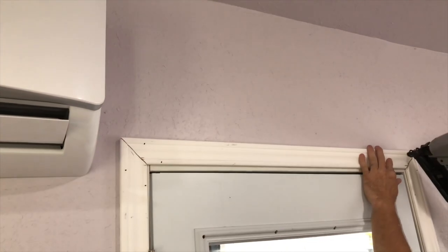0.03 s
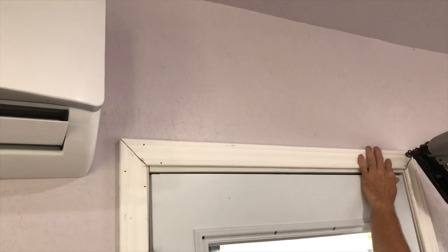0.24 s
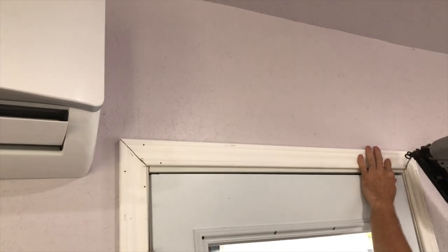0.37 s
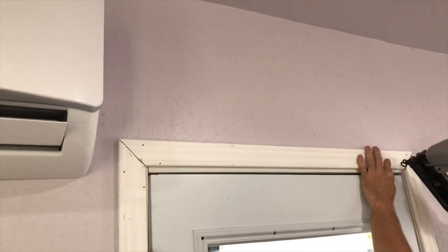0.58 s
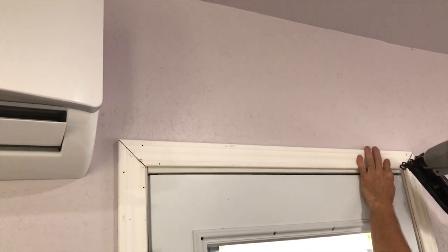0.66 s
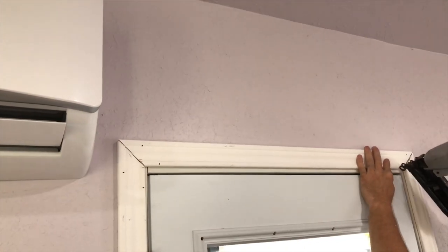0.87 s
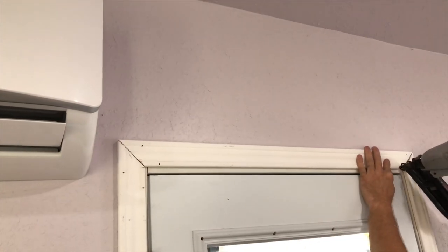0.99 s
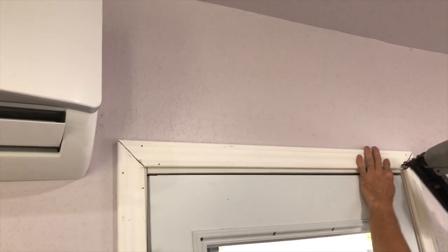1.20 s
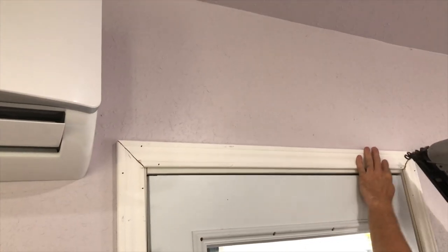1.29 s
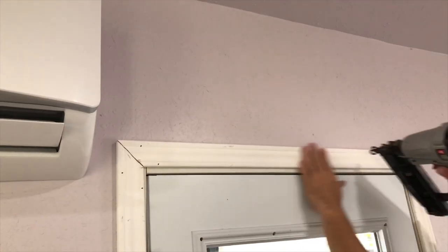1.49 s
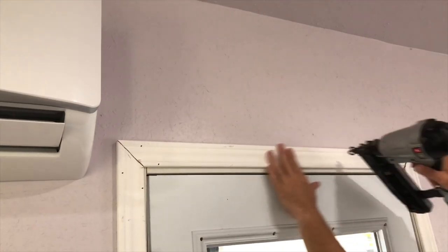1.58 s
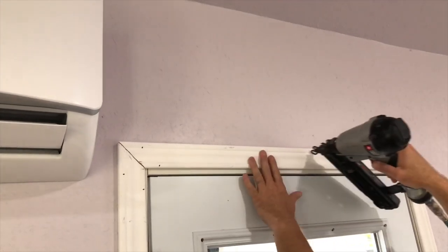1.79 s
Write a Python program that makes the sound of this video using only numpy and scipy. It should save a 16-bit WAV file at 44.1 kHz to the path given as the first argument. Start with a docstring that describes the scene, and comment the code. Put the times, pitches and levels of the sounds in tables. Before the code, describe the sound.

Nail gun shoots twice into door trim, clicking before each crack and hissing air after, echoing room

```python
"""Bare, very live room: a pneumatic nail gun fires twice into door trim, over quiet room tone and an old tail.
Nose clicks, squeak and wall boom: ringing modes, coloured noise bursts and a rough, narrow tone.
Shots: piston slam, nail blow 10 ms later (noise plus modes), then echoes, reflections and a long ring.
Exhaust: bright spit, fading hiss and low puff modes, washed out by diffuse reverberation.
The close microphone limits and clips."""
import sys
import numpy as np
from scipy import signal
from scipy.fft import rfft, irfft, next_fast_len
from scipy.io import wavfile

SR = 44100
rng = np.random.default_rng(int(sys.argv[2]) if len(sys.argv) > 2 else 0)


def generate_wav(sig):
    """Save sig (samples, or channels by samples) to the path in sys.argv[1] as 16-bit PCM at SR."""
    pcm = np.round(np.clip(np.atleast_2d(sig).T, -1, 1) * 32767).astype(np.int16)
    wavfile.write(sys.argv[1], SR, pcm)


N = 81585

# room decay: f/Hz, t60/s
ROOM_T60_S = [(60, 0.63), (200, 0.91), (460, 1.37), (1000, 1.99), (2000, 2.34), (4000, 1.64), (6300, 1.8),
              (9400, 0.86), (13000, 0.59), (16000, 0.45)]
# room response spectrum: f/Hz, gain/dB
ROOM_COLOUR_DB = [(40, 4), (100, -12), (150, -9.5), (250, 1), (500, -1), (1000, 0), (2400, -0.5),
                  (3200, -4), (4500, -3), (6500, -5.5), (10000, -3), (15500, -4)]
# quiet room tone: f/Hz, gain/dB
FLOOR_DB = [(20, -32), (60, -36), (110, -35), (160, -40.5), (320, -27.5), (600, -35), (1500, -25.5),
            (3000, -38.5), (8000, -49), (15500, -85)]
# what is left of an earlier shot, spectrum shape: f/Hz, gain/dB
OLD_TAIL_SHAPE_DB = [(24, -40), (40, -20), (82, -3.5), (150, -10.5), (220, -11.5), (412, -16), (580, -15),
                     (700, -10), (1000, -8.5), (1600, -7.5), (2250, -11), (3500, -23.5), (6500, -29.5),
                     (10000, -40), (15000, -47)]
OLD_TAIL_START_DB, OLD_TAIL_FALL_DB_PER_S = -31, 40

# nose squeak rubbing into place: start t/s, hold/s, level/dB
SQUEAK_TIMING = (0.98, .06, -31)
SQUEAK_START_HZ, SQUEAK_SAG_HZ_PER_S, SQUEAK_NOISE_CUTOFF_HZ = 834, 322, 99
# nose and trigger clicks: t/s, ring level/dB, grit level/dB
CLICKS = [(0.189, -20, -19), (0.19, -4.5, -19), (0.2018, -17, -10), (1.0065, -8, -10), (1.0092, -10, -10),
          (1.0124, -4, -3.5), (1.0142, -0.5, -11), (1.1217, -14, -14), (1.1282, -14, -11)]
# click ring: f/Hz, level/dB, t60/s
CLICK_MODES = [(1790, -24, 0.014), (2498, -23, .018), (3350, -20, .012), (3870, -17, .008),
               (4200, -13, 0.018), (4560, -28, .018), (7620, -29, 0.017), (10300, -32, 0.043)]
# click grit: f/Hz, gain/dB
CLICK_GRIT_DB = [(500, -9.5), (2000, -10.5), (5000, -8), (11000, -22.5), (15500, -37)]
# wall boom as the gun is pressed home: f/Hz, level/dB, t60/s
WALL_MODES = [(71, -22.5, 0.44), (128, -19.5, .06), (215, -21, 0.034), (286, -35, .25)]
# thud noise of the same press: f/Hz, gain/dB
THUD_DB = [(30, -12), (60, -5), (100, 0.5), (150, -9.5), (260, -10), (400, -21), (900, -39), (4000, -63)]
PRESS_S = 1.0265

# exhaust vents: t/s, spit level/dB, spit hold/s, hiss level/dB, puff level/dB, reverberation level/dB
VENTS = [(0.2994, 0, 0.0058, 1, -1.5, 1.5), (1.2160, -4.5, 0.0022, -3, -5.5, 0)]
# opening spit: f/Hz, gain/dB
SPIT_DB = [(100, -19), (500, -15.5), (1000, -2.5), (2500, -5.5), (4000, 1.5), (6500, 6), (10000, 1),
           (15500, -3.5)]
# escaping air: f/Hz, gain/dB
HISS_DB = [(40, -31), (100, -18), (200, -6), (420, -3), (1000, -6.5), (2000, -7), (3200, -8.5),
           (5200, -6.5), (6500, -5.5), (9400, -9.5), (12000, -14), (15500, -27.5)]
# low room modes stirred by the puff: f/Hz, level/dB, t60/s
PUFF_MODES = [(99.8, -15, 0.55), (64.8, -25.5, 0.94), (116.9, -16, 0.17)]
# what the exhaust leaves in the room: f/Hz, gain/dB
AIR_RETURN_DB = [(40, 5), (150, -2), (400, 21), (1000, 24), (2000, 22), (3200, 24), (5200, 29),
                 (6500, 29.5), (9400, 21), (12000, 11), (15500, 13)]
AIR_WET_DB, CLICK_WET_DB = -4.5, -1
SURGE_RMS_DB, SURGE_CUTOFF_HZ = 1.3, 70.5

# shots: t/s, piston level/dB, nail level/dB, first reflections level/dB, reverberation level/dB
SHOTS = [(0.2122, -2, -1.5, 1, 2), (1.134, -3.5, -6, -4, -3)]
NAIL_DELAY_S = 0.00991
# piston slam noise: f/Hz, gain/dB
PISTON_DB = [(40, -9), (200, 5.5), (460, -3), (900, 12), (1600, 2), (2600, -0.5), (4000, -6), (7000, -8),
             (10000, -8), (15500, -21)]
# gun body and trim rung by the piston: f/Hz, level/dB, t60/s
BODY_MODES = [(805, -11.5, 0.033), (1457, -1, 0.016), (1660, -2, 0.012), (2760, -3, 0.017),
              (3240, -8, 0.014), (4100, -2.5, 0.013), (6940, -7.5, 0.012)]
# dull knock of the trim: f/Hz, level/dB, t60/s
TRIM_MODES = [(150, -17.5, 0.054), (259, -16, 0.1)]
# nail blow noise: f/Hz, gain/dB
NAIL_DB = [(40, -25), (200, 14), (460, 4.5), (1000, 12), (2000, 6.5), (4000, 7), (6500, 5.5), (9400, -4),
           (15500, -14)]
# driver blade and nail: f/Hz, level/dB, t60/s
NAIL_MODES = [(1510, -4.5, 0.018), (2550, -4, 0.02), (3330, 0, .017), (4290, -11, 0.017), (6910, -7, 0.018),
              (7740, -16, 0.021)]
# first distinct echoes: delay t/s, level/dB
ECHOES = [(.0262, -7.5), (.0312, -17), (.0445, -17)]
# dense early reflections: f/Hz, gain/dB
REFLECTIONS_DB = [(40, -5), (130, -8), (250, -4.5), (500, 1.5), (720, 2), (950, -0.5), (1300, -7.5),
                  (2500, -1.5), (4000, -8.5), (6500, -4.5), (9400, -14.5), (15500, -41)]
# what a shot leaves in the room: f/Hz, gain/dB
BLOW_RETURN_DB = [(40, 4), (100, 4), (150, 17), (250, 30.5), (500, 23), (700, 21.5), (950, 35),
                  (1500, 25.5), (2400, 24.5), (3200, 30), (4500, 34), (6500, 20), (10000, 16), (15500, -11)]
# tones that linger after each shot: f/Hz, level/dB, t60/s
LINGERING_MODES = [(280.6, -43, 0.99), (392.3, -27, 1.14), (574, -29, 0.83), (672, -27, 0.54),
                   (870, -28, 1.23), (923, -29.5, 2), (1170, -44, 1.5), (1421, -47, 5.4), (2600, -29, 1.1),
                   (4479, -51, 1.1), (5150, -25.5, 1.3), (5800, -25.5, 0.97), (6600, -30, 1),
                   (7600, -28, 1.1)]
BARK_HZ, BARK_WIDTH_HZ, BARK_DB = 959, 120, 7.5

LOW_CUT_HZ, TOP_CUT_HZ = 38, 15850
LIMIT_DB, LIMIT_SHARE = -7, 0.58  # share of the overshoot taken off
LIMIT_SMOOTH_S, OVERSHOOT_FALL_DB_PER_S = 0.0014, 177  # fall is before the share
CLIP_TOP = 0.87


def from_db(db):
    """Decibels to gain."""
    return 10 ** (np.asarray(db) / 20)


def seconds():
    """Time of every sample."""
    return np.arange(N) / SR


def at_hz(points, hz):
    """Read a table on a log-frequency axis."""
    rows = np.array(points)
    return np.interp(np.log(np.maximum(hz, 1)), np.log(rows[:, 0]), rows[:, 1])


def colour(x, spectrum):
    """Causal minimum-phase filter with the given spectrum, via the folded cepstrum."""
    size = 2 * next_fast_len(N)
    gain = from_db(at_hz(spectrum, np.fft.rfftfreq(size, 1 / SR)))
    cepstrum = irfft(np.log(gain))
    cepstrum[1:size // 2] *= 2
    cepstrum[size // 2 + 1:] = 0
    return irfft(rfft(x, size) * np.exp(rfft(cepstrum)))[:N]


def envelope(start, attack, hold, t60):
    """Linear rise, hold, exponential fall; all in seconds."""
    age = seconds() - start
    rise = np.clip(age / attack, 0, 1)
    return rise * np.exp(-np.log(1000) * np.maximum(age - attack - hold, 0) / t60)


def burst(start, attack, hold, t60):
    """White noise under an envelope."""
    return rng.standard_normal(N) * envelope(start, attack, hold, t60)


def ring(start, modes, attack):
    """Decaying sine modes set off at one moment."""
    age = seconds() - start
    out = 0
    for hz, db, t60 in modes:
        out = out + from_db(db) * envelope(start, attack, 0, t60) * np.sin(2 * np.pi * hz * age)
    return out


def low_noise(cutoff_hz):
    """Low-passed noise at unit RMS."""
    sos = signal.butter(2, cutoff_hz, fs=SR, output="sos")
    noise = signal.sosfilt(sos, rng.standard_normal(N))
    return noise / np.std(noise)


def delayed(x, delay):
    """Same sound, later by whole samples."""
    return np.interp(np.arange(N) - np.round(delay * SR), np.arange(N), x, left=0)


def room_response(gap, build):
    """Diffuse reverberation: builds after a gap and dies band by band."""
    white = rng.standard_normal((2, N))
    edges = np.geomspace(35, 17000, num=21)
    out = 0
    for k, (low, high) in enumerate(zip(edges, edges[1:])):
        sos = signal.butter(2, [low, high], "band", fs=SR, output="sos")
        band = signal.sosfilt(sos, white[k % 2])  # neighbouring bands use different noise
        t60 = at_hz(ROOM_T60_S, np.sqrt(low * high))
        out = out + band * envelope(gap, build, 0, t60)
    return colour(out / np.sqrt(np.sum(out ** 2)), ROOM_COLOUR_DB)


def in_room(x, room):
    """What the room returns: convolution with its response."""
    return signal.fftconvolve(x, room)[:N]


def room_tone():
    """Steady coloured noise of the quiet room."""
    return colour(rng.standard_normal(N), FLOOR_DB)


def old_tail():
    """Last of an earlier shot's reverberation: coloured noise falling exponentially."""
    noise = colour(rng.standard_normal(N), OLD_TAIL_SHAPE_DB)
    level_db = OLD_TAIL_START_DB - OLD_TAIL_FALL_DB_PER_S * seconds()
    return noise / np.std(noise) * from_db(level_db)


def squeak():
    """Rough, narrow stick-slip tone that sags in pitch."""
    start, hold, db = SQUEAK_TIMING
    age = np.maximum(seconds() - start, 0)
    phase = 2 * np.pi * np.cumsum(SQUEAK_START_HZ - SQUEAK_SAG_HZ_PER_S * age) / SR
    in_phase = low_noise(SQUEAK_NOISE_CUTOFF_HZ) + 1
    quadrature = low_noise(SQUEAK_NOISE_CUTOFF_HZ)
    tone = in_phase * np.sin(phase) + quadrature * np.cos(phase)
    return from_db(db) * tone / np.std(tone) * envelope(start, 0.008, hold, 0.9)


def press_boom():
    """Gun pressed home: wall modes plus a dull noise thud."""
    thud = colour(burst(PRESS_S, 0.00086, 0.025, 0.5), THUD_DB)
    return ring(PRESS_S, WALL_MODES, attack=0.0023) + thud


def clicks(room):
    """Nose and trigger clicks: metal modes plus gritty noise that the room returns."""
    metal, grit = 0, 0
    for s, ring_db, grit_db in CLICKS:
        metal = metal + from_db(ring_db) * ring(s, CLICK_MODES, attack=0.00069)
        noise = burst(s, 0.000097, 0.0004, 0.026)
        grit = grit + from_db(grit_db) * colour(noise, CLICK_GRIT_DB)
    return metal + grit + from_db(CLICK_WET_DB) * in_room(grit, room)


def surging(x):
    """Turbulence flutters the level of an air blast: low-passed noise in dB."""
    return x * from_db(SURGE_RMS_DB * low_noise(SURGE_CUTOFF_HZ))


def exhaust(room):
    """Valve opens with spit and puff; hiss fades as the cylinder empties, slowly filling the room."""
    air, puff, wash = 0, 0, 0
    for s, spit_db, spit_hold, hiss_db, puff_db, late_db in VENTS:
        spit = colour(burst(s, 0.0025, spit_hold, 0.073), SPIT_DB)
        hiss = colour(burst(s, 0.028, 0.08, 0.36), HISS_DB)
        air = air + from_db(spit_db) * spit + from_db(hiss_db) * hiss
        puff = puff + from_db(puff_db) * ring(s + 0.0023, PUFF_MODES, attack=0.0086)
        diffuse = room_response(gap=0.022, build=0.065)
        wash = wash + from_db(late_db) * delayed(diffuse, s)
    wet = from_db(AIR_WET_DB) * in_room(air, room)
    return surging(air) + puff + wet + colour(wash, AIR_RETURN_DB)


def bark(start):
    """Hollow bark among the first reflections: blast noise through one narrow resonance."""
    b, a = signal.iirpeak(BARK_HZ, BARK_HZ / BARK_WIDTH_HZ, fs=SR)
    return from_db(BARK_DB) * signal.lfilter(b, a, burst(start + 0.041, 0.013, 0.014, 0.046))


def piston_slam(s):
    """Piston stops: noise burst, body modes, then the trim's dull knock."""
    noise = colour(burst(s, 0.0003, 0.0018, 0.012), PISTON_DB)
    body = ring(s, BODY_MODES, attack=0.00042)
    knock = ring(s + 0.00307, TRIM_MODES, attack=0.0021)
    return noise + body + knock


def nail_blow(home):
    """Nail goes home: noise burst plus blade and nail modes."""
    noise = colour(burst(home, 0.0004, 0.0032, 0.025), NAIL_DB)
    return noise + ring(home, NAIL_MODES, attack=0.0014)


def shots(room):
    """Piston and nail, then echoes, a dense reflection cluster and the long ring of the room."""
    out = 0
    for s, piston_db, nail_db, early_db, late_db in SHOTS:
        blow = from_db(piston_db) * piston_slam(s) + from_db(nail_db) * nail_blow(s + NAIL_DELAY_S)
        rattle = from_db(-18) * colour(burst(s, 0.0022, 0.012, 0.093), NAIL_DB)
        echoes = sum(from_db(db) * delayed(blow, delay) for delay, db in ECHOES)
        cluster = surging(colour(burst(s + 0.019, 0.029, 0.040, 0.043), REFLECTIONS_DB))
        early = rattle + echoes + cluster + bark(s)
        late = colour(delayed(room, s), BLOW_RETURN_DB) + ring(s + 0.03, LINGERING_MODES, attack=0.16)
        out = out + blow + from_db(early_db) * early + from_db(late_db) * late
    return out


def scene():
    """Sum of all sources at one microphone, on two identical channels."""
    room = room_response(gap=0.017, build=0.015)
    background = room_tone() + old_tail()
    handling = squeak() + press_boom() + clicks(room)
    mono = background + handling + exhaust(room) + shots(room)
    return np.array([mono, mono])


def one_pole(x, time_s):
    """Smooth with a time constant."""
    r = np.exp(-1 / (time_s * SR))
    return signal.lfilter([1 - r], [1, -r], x)


def limiter(x):
    """Duck on peaks: the held overshoot falls at a fixed dB rate, is smoothed, and a share is taken off."""
    level_db = 10 * np.log10(one_pole(x[0] ** 2, 0.0015) + 1e-12)
    over_db = np.maximum(level_db - LIMIT_DB, 0)
    ramp_db = OVERSHOOT_FALL_DB_PER_S * seconds()
    held_db = np.maximum.accumulate(over_db + ramp_db) - ramp_db
    return x * from_db(-LIMIT_SHARE * one_pole(held_db, LIMIT_SMOOTH_S))


def record(dry):
    """Bass cut, limiter, overload with a rounded knee, steep top cut."""
    x = signal.sosfilt(signal.butter(4, LOW_CUT_HZ, "high", fs=SR, output="sos"), dry)
    x = limiter(x)
    x = x / (1 + (x / CLIP_TOP) ** 8) ** (1 / 8)
    return signal.sosfilt(signal.ellip(10, 0.1, 70, TOP_CUT_HZ, fs=SR, output="sos"), x)


dry = scene()
out = record(dry)
generate_wav(out)
```